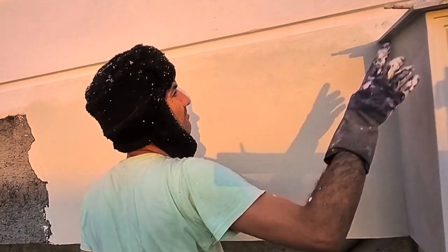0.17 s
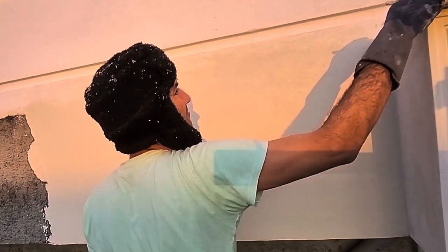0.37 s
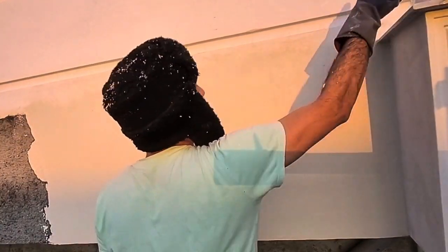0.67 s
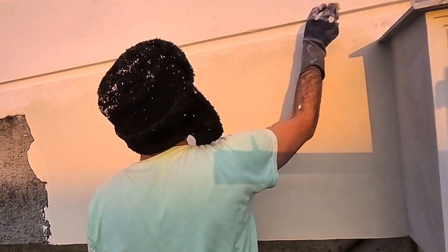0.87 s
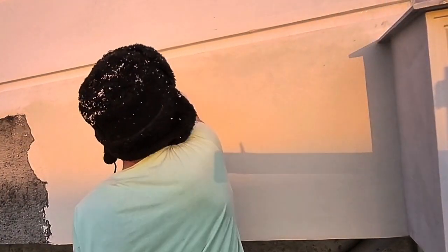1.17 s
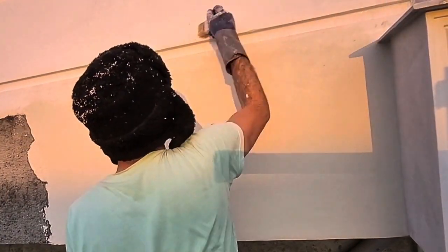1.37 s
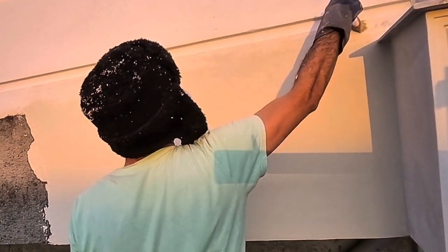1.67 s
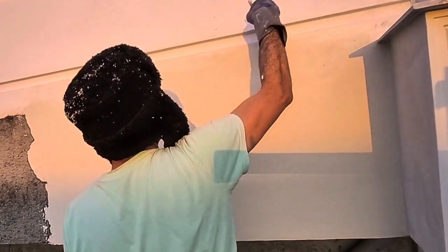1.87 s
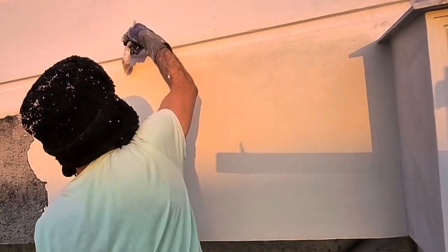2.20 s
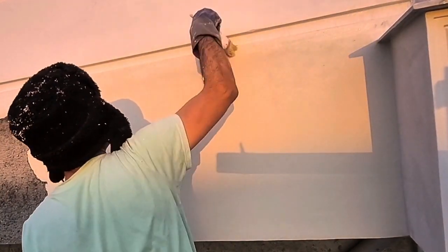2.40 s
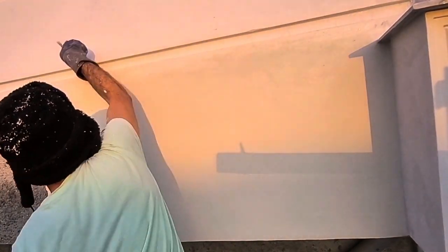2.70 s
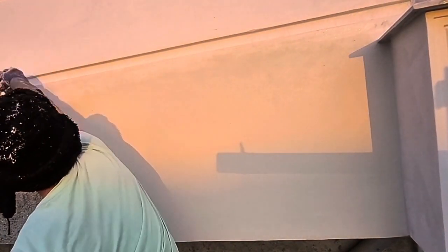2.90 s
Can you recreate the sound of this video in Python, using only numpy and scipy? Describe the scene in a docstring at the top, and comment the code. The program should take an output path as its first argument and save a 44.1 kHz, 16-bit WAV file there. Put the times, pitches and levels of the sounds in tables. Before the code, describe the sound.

A hand tool knocks and scrapes in short gritty strokes on a plastered outdoor wall.

```python
"""A worker brushes a freshly plastered outdoor wall in short strokes: shaped noise makes bristles hiss
and sand grate, and tiny noise bursts are single grains snapping. The tool's stock knocks on the wall,
twice hard: noise bursts with decaying tones, and a late boom of the wall after the firmer blows. It also
judders along the wall in random slips that ring the tool. Nearby walls answer knocks, clicks and drags
with fading noise; swelling low noise puffs as wind on the microphone, over a low rumble and faint air."""
import sys
import numpy as np
from scipy import signal
from scipy.fft import rfft, irfft
from scipy.io import wavfile
from scipy.ndimage import uniform_filter1d

SR = 44100
rng = np.random.default_rng(int(sys.argv[2]) if len(sys.argv) > 2 else 0)


def generate_wav(sig):
    """Save sig (samples, or channels by samples) to the path in sys.argv[1] as 16-bit PCM at SR."""
    pcm = np.round(np.clip(np.atleast_2d(sig).T, -1, 1) * 32767).astype(np.int16)
    wavfile.write(sys.argv[1], SR, pcm)


N = 134505

# Colour of the background rumble. Each row: frequency in Hz, relative level in dB per Hz.
RUMBLE_COLOUR = [(25, -4), (48, 5.5), (110, 1), (180, -10.5), (280, -7.5), (450, -18.5), (800, -46.5)]
# Loudness of the rumble over time. Each row: time in seconds, level in dB.
RUMBLE_LEVEL = [(0, -56), (.2, -50), (1.9, -49), (2.15, -40.5), (2.35, -49), (2.85, -45), (3.05, -54)]
# Colour of the faint outdoor air. Each row: frequency in Hz, relative level in dB per Hz.
AIR_COLOUR = [(400, -4.5), (2400, -13.5), (16000, -35.5)]
# Loudness of the air over time. Each row: time in seconds, level in dB before panning.
AIR_LEVEL = [(0, -56), (.08, -67), (.7, -65.5), (1.3, -59.5), (3.05, -59)]

# Brush strokes. Each row: start in seconds, length in seconds, rise in seconds, bristle hiss in dB,
# sand scrape in dB (both before the arch and pressure changes), left over right in dB.
STROKES = [(0.302, 0.16, 0.1, -60.5, -56, 1.5), (0.466, 0.1, 0.0058, -69, -63.5, 0),
           (0.728, 0.2, 0.17, -56.5, -55, 7), (0.906, 0.2, 0.016, -49.5, -72, 1),
           (1.12, 0.12, 0.092, -73, -55.5, 6), (1.274, 0.18, 0.14, -44.5, -54, 7.5),
           (1.524, 0.11, 0.015, -49.5, -47.5, 2.5), (1.65, 0.32, 0.043, -54.5, -55.5, 6),
           (1.905, 0.082, 0.038, -51.5, -49.5, 3), (1.978, 0.13, 0.071, -44.5, -45.5, 5),
           (2.107, 0.11, 0.036, -59.5, -52, 0), (2.236, 0.13, 0.065, -46, -56.5, 9),
           (2.444, 0.22, 0.022, -47, -43.5, 2), (2.661, 0.15, 0.11, -49, -44, 5.5),
           (2.809, 0.051, 0.015, -52, -56, 2)]
# Colour of the bristle hiss. Each row: frequency in Hz, relative level in dB per Hz.
HISS_COLOUR = [(700, -34), (1800, -2.5), (4400, 1), (5200, 4.5), (7900, 8), (9100, -4), (11000, -3),
               (13900, 2.5), (16000, -7.5)]
# Colour of the sand scrape. Each row: frequency in Hz, relative level in dB per Hz.
SAND_COLOUR = [(240, -27), (400, -1.5), (719, -6.5), (1170, -0.5), (1530, 3.5), (4440, 0), (7750, -10),
               (8900, -22), (16000, -29)]
# Sand grains snapping under the tool. Each row: time in seconds, level in dB before panning.
CLICKS = [(0.4047, -47), (0.563, -52), (0.8628, -41), (2.57, -34), (2.629, -44)]
# Echo of nearby walls, by band. Each row: low edge in Hz, high edge in Hz,
# time to fall 60 dB in seconds, level in dB.
ECHO_BANDS = [(100, 496, 0.28, -6), (456, 1710, 0.25, -7.5), (1950, 3900, 0.24, -8.5),
              (4880, 16000, 1, -13.5)]

# Contacts that make up the knocks, each with one added note; the first three rows form one hard knock.
# Each row: start in seconds, contact decay in seconds, thud, body, crack, grit and ring levels in dB,
# note in Hz, note level in dB (all levels before panning).
CONTACTS = [(0.9211, 0.0039, -32.5, -27, -43, -44, -48, 610, -29.5),
            (0.9238, 0.0019, -55, -57, -30.5, -37.5, -48, 3760, -37.5),
            (.926, 0.013, -25.5, -35.5, -44, -52, -54, 1950, -29),
            (1.933, 0.0089, -39.5, -41, -44.5, -56, -47, 630, -30.5),
            (2.0133, 0.019, -35.5, -32.5, -42.5, -51, -38.5, 538, -33.5),
            (2.158, 0.0063, -62, -66, -41.5, -48, -46, 2620, -38),
            (2.2604, 0.0023, -65, -31.5, -51, -50, -50, 1340, -41.5),
            (2.2674, 0.0063, -67, -40, -58, -64, -63, 930, -41),
            (2.4634, 0.0054, -22.5, -21, -36, -61, -40, 500.6, -18),
            (2.4692, 0.0045, -32.5, -26, -16.5, -31.5, -15.5, 4060, -25),
            (2.5535, 0.0033, -38, -35, -31.5, -34.5, -35.5, 1610, -31),
            (2.592, 0.0031, -32.5, -31.5, -33.5, -38, -44, 4200, -35),
            (2.636, 0.0056, -46, -37, -33.5, -41.5, -51, 4150, -36.5)]
# Thud, body, crack and grit bands of a contact. Each row: low edge in Hz, high edge in Hz.
KNOCK_BANDS = [(100, 283), (540, 1820), (1900, 4630), (4700, 18200)]
# Left over right for thud, body, crack and grit. One column: level difference in dB.
KNOCK_PAN_DB = [4.5, 3.5, -1, -6]
# Ringing tones (modes) of the tool against the wall. Each row: frequency in Hz, relative level in dB,
# time to fall 60 dB in seconds.
TOOL_MODES = [(260.4, -4, 0.14), (495, 1, .09), (765, -4.5, 0.12), (920, -0.5, 0.089), (1044, -8.5, 0.15),
              (1528, 7, 0.12), (1620, -0.5, 0.19), (1917, -8, 0.2), (2337, -7.5, 0.2), (2627, 8, 0.06),
              (3340, -3, 0.084), (4460, -11, 0.19)]
# Skids of the stock after a blow. Each row: start in seconds, length in seconds, release in seconds,
# level in dB before panning.
DRAGS = [(0.929, 0.026, 0.035, -37.5), (2.549, 0.085, 0.014, -33)]
# Colour of the noise in a skid. Each row: frequency in Hz, relative level in dB per Hz.
SLIP_COLOUR = [(150, 11), (380, -2.5), (650, 2.5), (1200, -11.5), (2200, -21), (4200, -11), (9000, -27.5)]
# Hollow booms of the wall after firm blows. Each row: start in seconds, level in dB before panning.
BOOMS = [(.93, -26.5), (2.025, -33.5), (2.468, -33)]
# Ringing tones (modes) of the wall. Each row: frequency in Hz, relative level in dB,
# time to fall 60 dB in seconds.
WALL_MODES = [(146.3, 1, 0.11), (171.2, -4, 0.38), (237, 2, 0.23), (271, 1, 0.36), (322, 3, 0.16)]
# Puffs of wind on the microphone. Each row: middle in seconds, level in dB on the left port.
PUFFS = [(1.162, -36), (1.236, -34.5), (1.34, -28), (1.479, -24), (1.653, -29), (1.745, -30.5),
         (1.793, -32), (2.478, -34.5), (2.557, -27), (2.745, -34)]
# Colour of the wind. Each row: frequency in Hz, relative level in dB per Hz.
WIND_COLOUR = [(20, -17), (45, 10), (80, 5), (130, -3.5), (220, -22.5), (1200, -61)]

# The two microphone ports; a pan says how many dB the left is louder than the right
PORT_LAG_S, DIFFUSE_HZ, TOP_HZ = 0.00024, 900, 16100
AIR_PAN_DB, RING_PAN_DB, DRAG_PAN_DB, BOOM_PAN_DB = 4.5, 9.5, 1, 1.5
# Friction: shares are of the power; the pressure setting is the typical size of its slow changes
GRAINS_PER_S, GRAIN_SPREAD_DB, GRAIN_SHARE = 2200, 5, 0.69
HISS_DIFFUSE, PRESSURE_DB, PRESSURE_STEPS_PER_S = 0.76, 2.63, 43.83
RELEASE_S, ARCH_DB = 0.015, 3  # fade after a stroke; its middle over its ends
CLICK_LOW_HZ, CLICK_HIGH_HZ, CLICK_DECAY_S = 900, 5660, 0.0018
YARD_DELAY_S = 0.0083
CONTACT_RISE_S, CONTACT_HOLD_S = 0.004, 0.0015
CONTACT_RISE_SHARE = 0.61  # softer contacts build up more slowly: rise time over decay time
KNOCK_DIFFUSE = 0.63  # share of the contact noise scattered by the wall
NOTE_T60_S, NOTE_RISE_S = 0.044, 0.0048
RING_WOBBLE, WOBBLE_S = 0.0077, 0.0017  # the grip on the wall unsettles the modes: share of pitch, time
PORT_SCATTER_TURNS = 0.085  # spread of each mode's phase between the ports
SKID_RISE_S, PRESSED_T60_SHARE = 0.0093, 0.6
JUDDER_HZ, JUDDER_SCATTER, JUDDER_DB = 58.28, 0.25, 12  # catches a second, unevenness, fall after each
SLIPS_PER_S, SLIP_NOISE_DB = 1100, 0.5  # the noise level is relative to the ringing
BOOM_PUSH_S = 0.0071
PUFF_WIDTH_S, WIND_RIGHT_DB = 0.024, -20  # middle to half height; right port against left


def undb(db):
    """Turn decibels into gain."""
    return 10 ** (np.asarray(db) / 20)


def unit(x):
    """Scale to an average strength (rms) of 1."""
    return x / np.sqrt(np.mean(x ** 2))


def clock():
    """Time of every sample in seconds."""
    return np.arange(N) / SR


def curve(rows):
    """Gain that moves along points of time in seconds and level in dB."""
    return undb(np.interp(clock(), *np.array(rows).T))


def colour(x, points):
    """Shape noise by points of Hz and dB, falling away below the first point; rms 1."""
    hz, db = np.array(points).T
    f = np.maximum(np.arange(N // 2 + 1) * SR / N, 1)
    gain = undb(np.interp(np.log(f), np.log(hz), db))
    bass_cut = np.minimum(f / hz[0], 1) ** 2
    return unit(irfft(rfft(x) * gain * bass_cut, N))


def band(x, lo_hz, hi_hz):
    """Keep only the sound between two frequencies."""
    edges = [lo_hz, min(hi_hz, SR / 2 - 100)]
    return signal.sosfilt(signal.butter(4, edges, "band", fs=SR, output="sos"), x)


def walk(rate):
    """Smooth random drift around zero, with a spread near 1."""
    k = int(SR / rate)
    steps = np.repeat(rng.standard_normal(N // k + 1), k)
    smooth = uniform_filter1d(uniform_filter1d(steps, k), k)
    return unit(smooth[:N])


def gesture(start, length, rise, release):
    """Rise, hold, then fade exponentially."""
    t = clock() - start
    return np.clip(t / rise, 0, 1) * np.exp(-np.maximum(t - length, 0) / release)


def place(x, pan_db):
    """The sound reaches the left port first; the pan makes one port louder."""
    left, right = np.broadcast_to(x, (2, N))
    late_right = np.interp(clock() - PORT_LAG_S, clock(), right)
    return np.array([left * undb(pan_db / 2), late_right * undb(-pan_db / 2)])


def diffuse():
    """Two noises, much alike in the bass and nearly unrelated in the treble."""
    mid, side = rfft(rng.standard_normal((2, N)))
    alike = 0.9 / (1 + (np.arange(N // 2 + 1) * SR / N / DIFFUSE_HZ) ** 2)
    mid, side = mid * np.sqrt(1 + alike), side * np.sqrt(1 - alike)
    return unit(irfft(np.array([mid + side, mid - side]), N))


def grains(rate):
    """Random tiny impacts of uneven size."""
    size = undb(GRAIN_SPREAD_DB * np.minimum(rng.exponential(size=N), 4))
    hits = rng.random(N) < rate / SR
    return unit(hits * size * rng.standard_normal(N))


def ring(modes, start):
    """Modes struck together fade away; their pitch wobbles and their phase differs between ports."""
    t = clock()[:SR // 2, None]
    hz, db, t60 = np.array(modes).T
    drift = rng.standard_normal((len(t), len(hz)))
    wobble = unit(uniform_filter1d(drift, int(WOBBLE_S * SR), axis=0))
    turns = np.cumsum(hz * (1 + RING_WOBBLE * wobble), axis=0) / SR + rng.random(len(hz))
    ports = PORT_SCATTER_TURNS * rng.standard_normal((2, 1, len(hz)))
    fade = np.exp(-np.log(1000) * t / t60)
    waves = undb(db) * fade * np.sin(2 * np.pi * (turns + ports))
    onset = np.minimum(t[:, 0] / CONTACT_RISE_S, 1)
    y = waves.sum(2) * onset / np.sqrt(np.sum(undb(db) ** 2) / 2)
    return np.pad(y, ((0, 0), (int(start * SR), N)))[:, :N]


def background():
    """A low rumble and faint outdoor air: two shaped noises with slowly moving levels."""
    rumble = colour(diffuse(), RUMBLE_COLOUR) * curve(RUMBLE_LEVEL)
    air = colour(diffuse(), AIR_COLOUR) * curve(AIR_LEVEL)
    return rumble + place(air, AIR_PAN_DB)


def friction(spectrum):
    """Countless bristle contacts and coarser grains, partly scattered by the wall."""
    bristles = rng.standard_normal(N)
    x = np.sqrt(GRAIN_SHARE) * grains(GRAINS_PER_S) + np.sqrt(1 - GRAIN_SHARE) * bristles
    mixed = np.sqrt(1 - HISS_DIFFUSE) * x + np.sqrt(HISS_DIFFUSE) * diffuse()
    pressure = undb(PRESSURE_DB * walk(PRESSURE_STEPS_PER_S))
    return colour(mixed, spectrum) * pressure


def strokes():
    """Each brush stroke swells, is lifted midway by an arch and fades as the tool lifts."""
    hiss, sand, out = friction(HISS_COLOUR), friction(SAND_COLOUR), 0
    for start, length, rise, hiss_db, sand_db, pan_db in STROKES:
        progress = np.clip((clock() - start) / length, 0, 1)
        arch = undb(ARCH_DB * (np.sin(np.pi * progress) - 1.5))
        swell = arch * gesture(start, length, rise, RELEASE_S)
        rub = undb(hiss_db) * hiss + undb(sand_db) * sand
        out = out + place(swell * rub, pan_db)
    return out


def clicks():
    """Single grains break away with a tiny snap: a very short burst of noise."""
    snap = unit(band(rng.standard_normal(N), CLICK_LOW_HZ, CLICK_HIGH_HZ))
    force = 0
    for start, db in CLICKS:
        force = force + undb(db) * gesture(start, CONTACT_RISE_S, CONTACT_RISE_S, CLICK_DECAY_S)
    return place(snap * force, RING_PAN_DB)


def yard(x):
    """A noise echo from the walls around, strongest in the lows; its weaker treble fades more slowly."""
    t, noise = clock()[:SR // 2], diffuse()[:, :SR // 2]
    tail = 0
    for lo, hi, t60, db in ECHO_BANDS:
        fade = np.exp(-np.log(1000) * t / t60) * (t > YARD_DELAY_S)
        tail = tail + undb(db) * band(noise * fade, lo, hi) / np.sqrt(np.sum(fade ** 2))
    return signal.fftconvolve(x, tail, axes=1)[:, :N]


def knocks():
    """Brief crunching contacts set the tool ringing, each with one added note."""
    dry_noise = rng.standard_normal(N)
    noise = np.sqrt(1 - KNOCK_DIFFUSE) * dry_noise + np.sqrt(KNOCK_DIFFUSE) * diffuse()
    crunch = [band(noise, lo, hi) for lo, hi in KNOCK_BANDS]
    power = np.mean(np.square(crunch), axis=1)
    force, tones = 0, 0
    for start, decay, thud_db, body_db, crack_db, grit_db, ring_db, note_hz, note_db in CONTACTS:
        rise = CONTACT_RISE_SHARE * decay
        contact = gesture(start, rise + CONTACT_HOLD_S, rise, decay)
        # even out the luck of the noise during this contact
        even = np.sqrt(np.sum(contact ** 2) / (power @ contact ** 2))
        gains = undb([thud_db, body_db, crack_db, grit_db]) * even
        force = force + np.outer(gains, contact)
        wave = np.sin(2 * np.pi * (note_hz * clock() + rng.random()))
        note = wave * gesture(start, NOTE_RISE_S, NOTE_RISE_S, NOTE_T60_S / np.log(1000))
        tones = tones + undb(ring_db) * ring(TOOL_MODES, start) + undb(note_db) * note
    out = place(tones, RING_PAN_DB)
    for x, push, pan_db in zip(crunch, force, KNOCK_PAN_DB):
        out = out + place(x * push, pan_db)
    return out


def drags():
    """The stock skids over the plaster in a judder of sharp slips; pressed down, its modes die sooner."""
    cycle = np.cumsum(JUDDER_HZ * (1 + JUDDER_SCATTER * walk(JUDDER_HZ))) / SR % 1
    slips = grains(SLIPS_PER_S) * undb(-JUDDER_DB * cycle)
    pressed = ring([(hz, db, t60 * PRESSED_T60_SHARE) for hz, db, t60 in TOOL_MODES], 0)
    ringing = unit(signal.fftconvolve(slips[None], pressed, axes=1)[:, :N])
    sound = ringing + undb(SLIP_NOISE_DB) * colour(slips, SLIP_COLOUR)
    force = 0
    for start, length, release, db in DRAGS:
        force = force + undb(db) * gesture(start, length, SKID_RISE_S, release)
    return place(unit(sound) * force, DRAG_PAN_DB)


def booms():
    """The wall answers firm blows with a hollow boom of its modes that swells a little late."""
    out = 0
    for start, db in BOOMS:
        push = np.clip((clock() - start) / BOOM_PUSH_S, 0, 1)
        out = out + undb(db) * ring(WALL_MODES, start) * push
    return place(out, BOOM_PAN_DB)


def wind():
    """Short eddies buffet the ports, mostly the left one: low noise that swells and sinks."""
    eddies, out = colour(rng.standard_normal((2, N)), WIND_COLOUR), 0
    for middle, db in PUFFS:
        swell = 1 / (1 + ((clock() - middle) / PUFF_WIDTH_S) ** 2)
        puff = eddies * swell
        # even out the luck of the noise during this puff
        even = np.sqrt(np.sum(swell ** 2) / np.sum(puff ** 2, axis=1, keepdims=True))
        out = out + undb(db) * puff * even
    return out * undb([[0], [WIND_RIGHT_DB]])


def scene():
    """Tool, wall and surroundings; only knocks, clicks and drags are echoed."""
    blows = knocks() + clicks() + drags()
    return blows + yard(blows) + booms() + strokes() + wind() + background()


def record(dry):
    """The recorder cuts the top of the treble."""
    return signal.sosfilt(signal.ellip(8, 0.2, 70, TOP_HZ, fs=SR, output="sos"), dry)


dry = scene()
out = record(dry)
generate_wav(out)
```